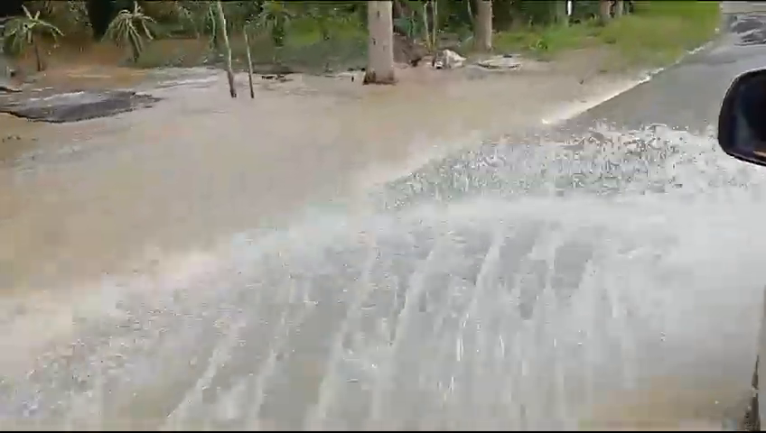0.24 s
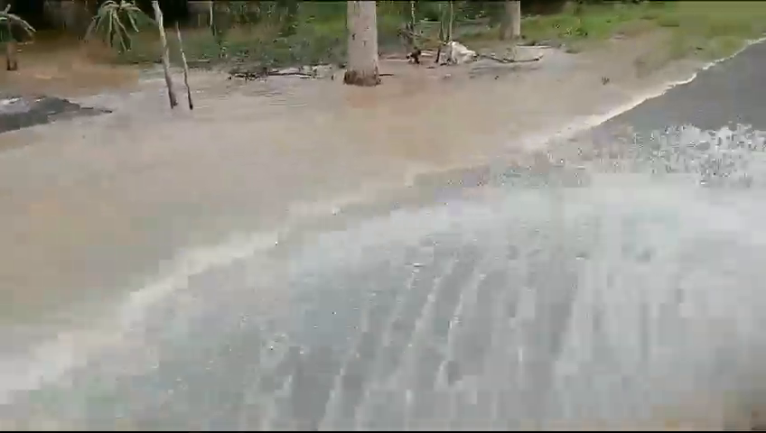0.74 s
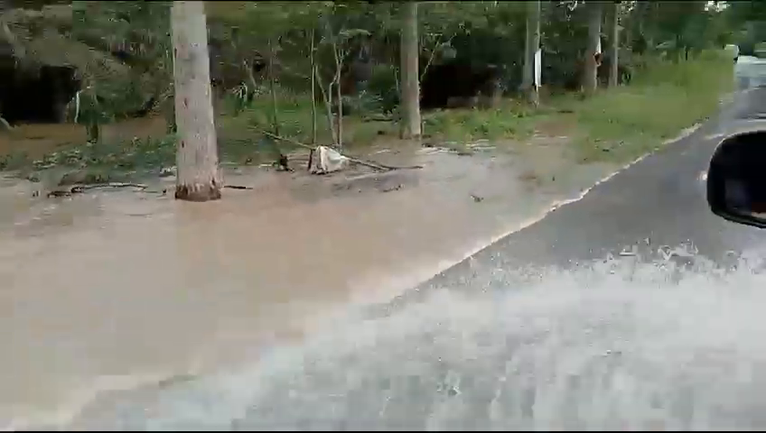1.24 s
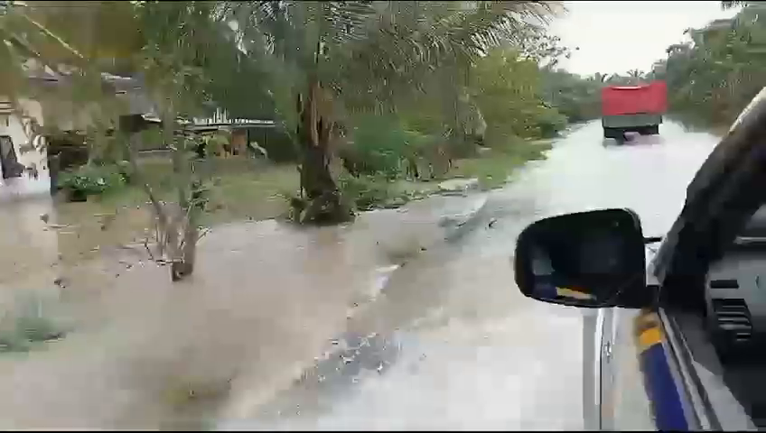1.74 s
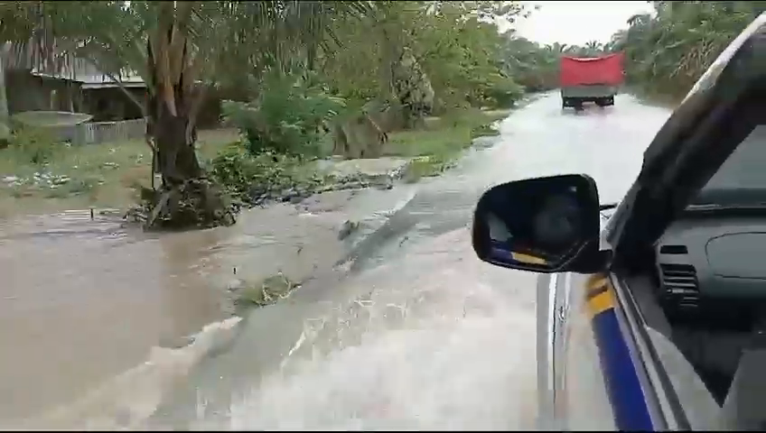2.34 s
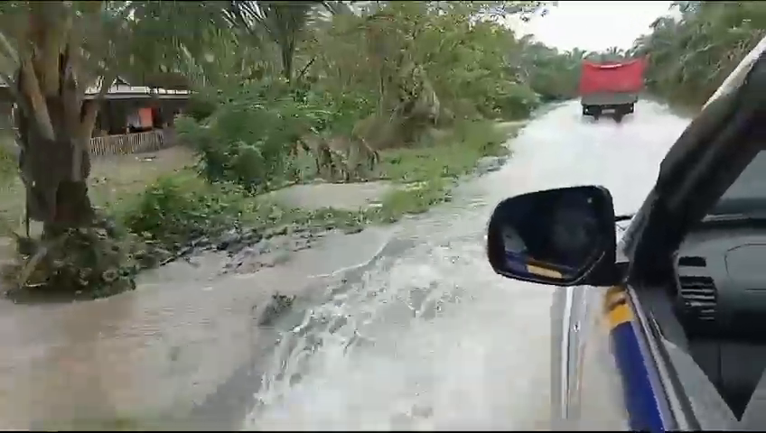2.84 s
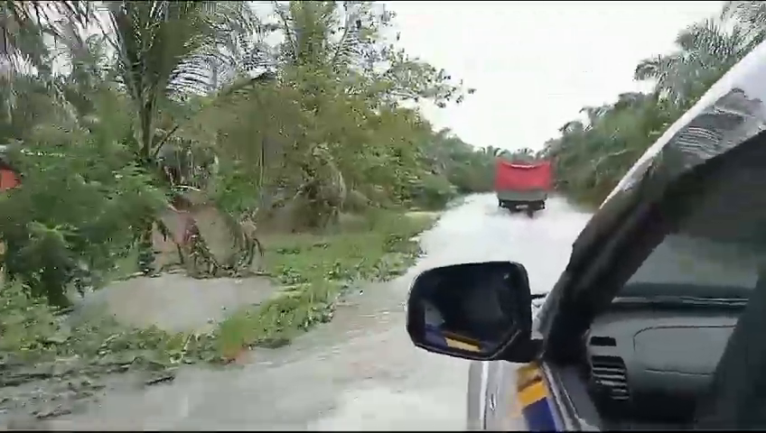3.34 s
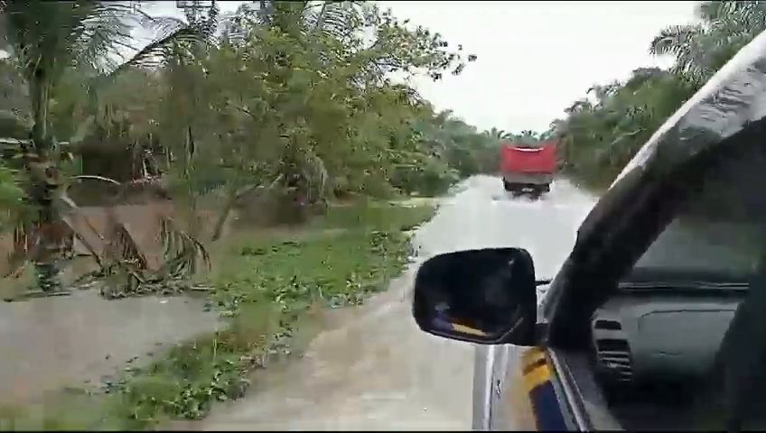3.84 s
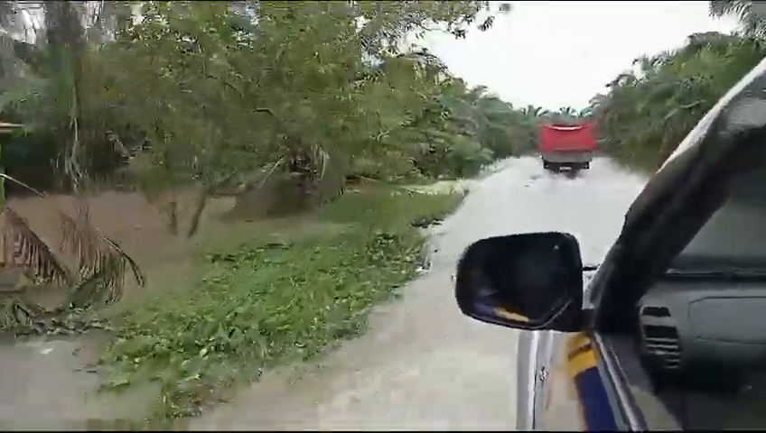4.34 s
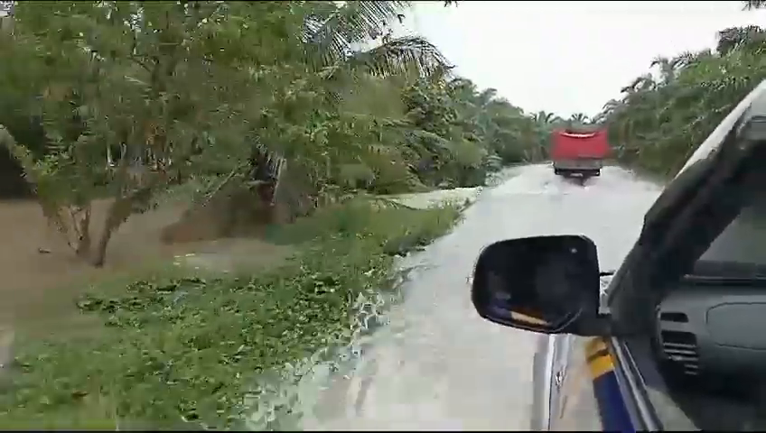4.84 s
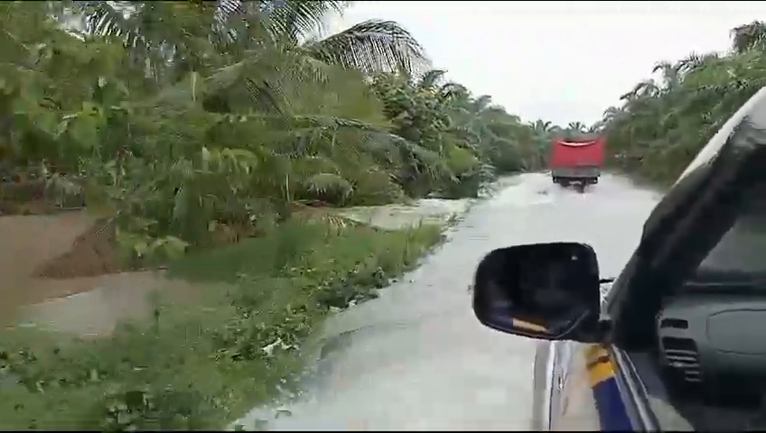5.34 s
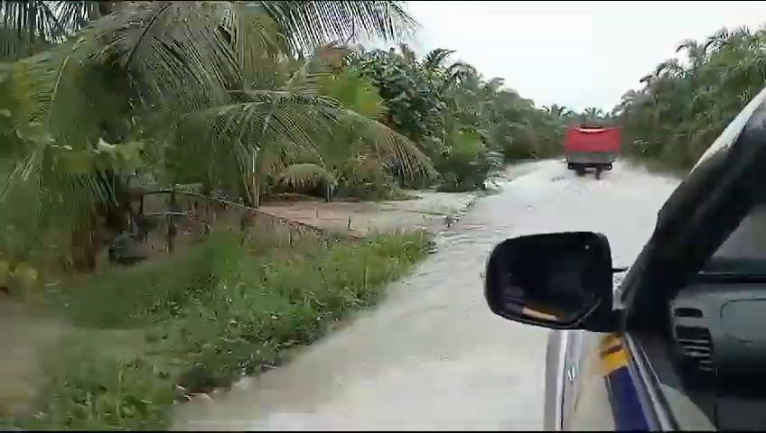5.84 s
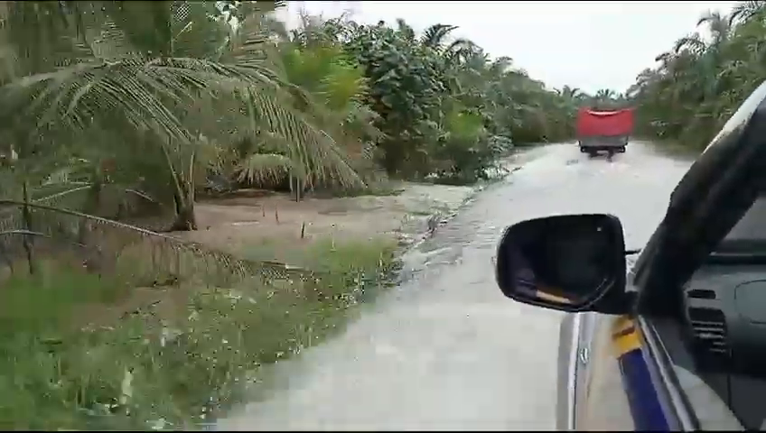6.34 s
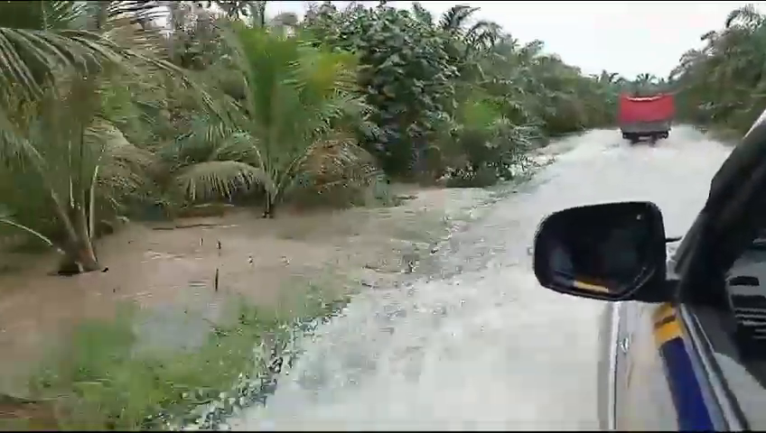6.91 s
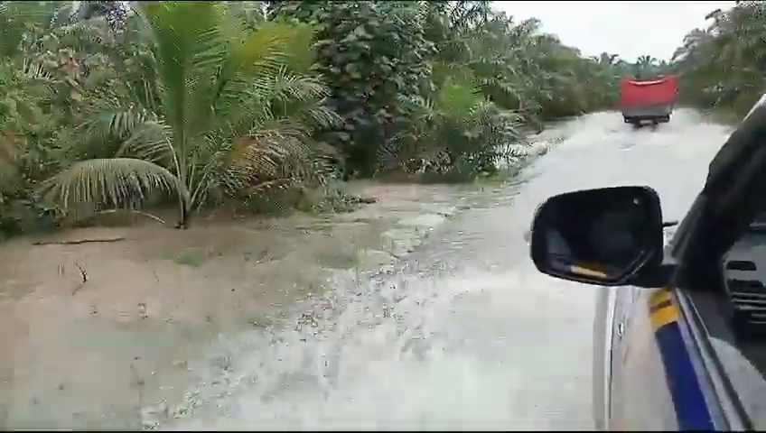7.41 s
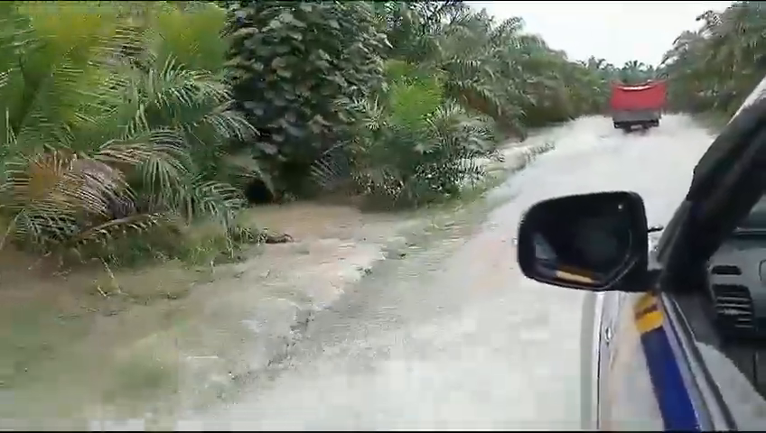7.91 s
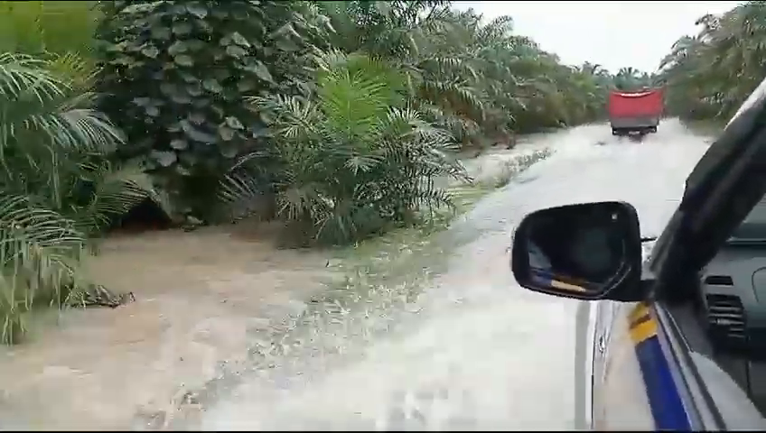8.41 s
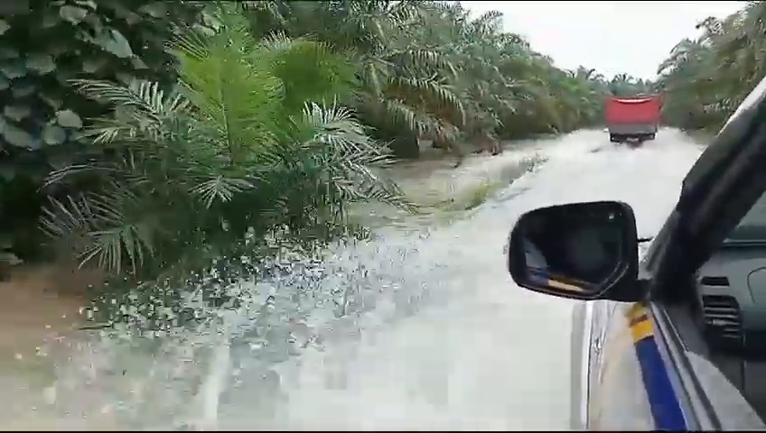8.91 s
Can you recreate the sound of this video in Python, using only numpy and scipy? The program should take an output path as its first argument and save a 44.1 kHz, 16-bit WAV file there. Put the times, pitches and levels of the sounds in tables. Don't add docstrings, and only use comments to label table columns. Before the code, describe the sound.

A car wades through floodwater: dense splashing hiss, low slosh, buffeting wind that grows rougher, and one brief gap of silence.

```python
import sys
import numpy as np
from scipy import signal
from scipy.fft import rfft, irfft, next_fast_len
from scipy.io import wavfile
from scipy.ndimage import uniform_filter1d, minimum_filter1d

SR = 44100
rng = np.random.default_rng(int(sys.argv[2]) if len(sys.argv) > 2 else 0)


def volts_from_db(level):
    exponent = np.asarray(level, float) / 20
    return 10 ** exponent


def transcribe(u):
    v = np.clip(np.atleast_2d(u).T, -1, 1)
    q = np.round(v * 32767).astype(np.int16)
    wavfile.write(sys.argv[1], SR, q)


N = 403948

CUT_S, BACK_S, WHOLE_S = 1.6524, 2.1566, 2.1668


def evened(x):
    return x / np.sqrt(np.mean(x ** 2) + 1e-20)


def smoothed(x, samples):
    return uniform_filter1d(uniform_filter1d(x, samples), samples)


def drift(span_s):
    return evened(smoothed(rng.standard_normal(N), int(span_s * SR)))


def column(table, t, count):
    rows = np.array(table)
    return np.interp(t, rows[:, 0], rows[:, count])


def read(spectrum, hz):
    f, db = np.transpose(spectrum)
    return np.interp(np.log(hz + 1), np.log(f + 1), db)


def band_db(spectrum, lo, hi):
    hz = np.arange(lo, hi)
    return 10 * np.log10(np.sum(volts_from_db(read(spectrum, hz)) ** 2) / (SR / 2))


def coloured_noise(spectrum):
    size = next_fast_len(N)
    gain = volts_from_db(read(spectrum, np.fft.rfftfreq(size, 1 / SR)))
    return evened(irfft(rfft(rng.standard_normal(N), size) * gain, size)[:N])


def steadied(x, span_s, share):
    power = smoothed(x ** 2, int(span_s * SR))
    return evened(x / (abs(power) + 1e-3) ** (share / 2))


def engine(t):
    pitch_hz, width_hz, level_db = 117, 12, -34
    r = np.exp(-np.pi * width_hz / SR)
    chance = rng.standard_normal(N) + 1j * rng.standard_normal(N)
    waver = signal.lfilter([1 - r], [1, -r], chance)
    return volts_from_db(level_db) * evened((waver * np.exp(2j * np.pi * pitch_hz * t)).real)


# frequency in Hz, level in dB per Hz.
SLOSH_COLOUR = [(24, -48.5), (40, -17), (118, 5), (221, -5), (413, -5), (709, -4), (865, -2.5),
                (1200, -5.5), (1560, -5), (2640, -120)]


def slosh(t):
    level_db, follows, surge_db = -27.5, .3, 3
    amount_db = column(SPRAY_AMOUNT, t, count=1)
    level_db = level_db + follows * (amount_db - amount_db.mean()) + surge_db * drift(.04)
    rumble_cut = signal.butter(2, 42, "highpass", fs=SR, output="sos")
    return volts_from_db(level_db) * signal.sosfilt(rumble_cut, coloured_noise(SLOSH_COLOUR))


def pops():
    pops_per_s, pop_s, level_db, spread_db = 130, .00042, 5.5, 2.5
    u = np.arange(-300, 301) / SR / pop_s
    spike = np.exp(-u ** 2 / 2) - np.exp(-(u / 3.1) ** 2 / 2) / 3.1
    size = rng.choice([-1., 1.], N) * volts_from_db(spread_db * np.minimum(rng.exponential(1, N), 3))
    hits = size * (rng.random(N) < pops_per_s / SR)
    return volts_from_db(level_db) * signal.oaconvolve(hits, spike, "same")


# time in seconds, strength in dB.
BREEZE_STRENGTH = [(0.0, -39), (.25, -18.5), (.75, -21.5), (1.25, -24), (1.42, -42.5), (2.4, -33.5),
                   (2.75, -22.5), (3.25, -45), (3.5, -21), (4.2, -28), (4.45, -29), (4.75, -21),
                   (5.55, -17.5), (5.72, -22.5), (6.3, -16), (6.85, -24.5), (8.7, -15), (9.05, -39)]
# frequency in Hz, level in dB per Hz.
THUMP_COLOUR = [(25, -44), (45, -30.5), (70, -2), (130, 1), (200, -2.5), (260, -14), (400, -44.5),
                (800, -74)]
# frequency in Hz, level in dB per Hz.
FLAP_COLOUR = [(120, -48), (190, -11.5), (250, 4), (400, -4), (600, -15), (1000, -42.5), (2000, -75)]
# time in seconds, peak in dB, length in seconds.
DULL_THUDS = [(.335, -10, 0.014), (0.373, -12.5, .026), (0.468, -11.9, .017), (0.678, -20, .029),
              (.905, -13, 0.027), (1.17, -15, 0.025), (1.302, -19.5, 0.018), (3.962, -17.5, 0.041),
              (4.49, -19, .018), (4.673, -18, .017), (4.769, -8.5, 0.021), (4.854, -17, .02),
              (4.968, -7, 0.026), (5.012, -10.5, 0.028), (5.168, -11.5, .026), (5.24, -16.5, 0.031),
              (5.529, -12.5, 0.019), (6.107, -14, 0.024), (6.167, -14, 0.033), (6.304, -13, 0.027),
              (6.352, -16, .014), (6.793, -11, 0.015), (7.36, -6.5, 0.027), (7.652, -11, 0.028),
              (7.718, -11, 0.046), (7.977, -9, .025), (8.045, -11, 0.033), (8.102, -13, 0.012),
              (8.417, -11, 0.022), (8.828, -13.5, 0.015)]
# time in seconds, peak in dB, length in seconds.
BRIGHT_SLAPS = [(0.016, -11, 0.025), (0.571, -14, 0.012), (0.968, -10, 0.021), (1.207, -8.5, 0.015),
                (1.254, -11.5, 0.026), (3.41, -13.5, 0.027), (3.87, -13, .04), (4.624, -14.5, 0.034),
                (4.828, -12, .025), (5.288, -10, 0.038), (5.488, -14.5, 0.075), (6.27, -7, 0.015),
                (6.429, -6.5, 0.022), (6.542, -9.5, 0.034), (6.843, -11, .025), (7.037, -12.5, 0.058),
                (7.106, -10.5, 0.037), (7.236, -11.5, 0.021), (7.294, -12, 0.039), (7.401, -9, 0.04),
                (7.478, -11, 0.044), (7.882, -5.5, 0.022), (7.921, -7.5, 0.021), (8.261, -11.5, 0.053),
                (8.351, -9, 0.011), (8.498, -10, 0.042), (8.58, -9.5, .035), (8.631, -9.5, 0.043),
                (8.751, -10, 0.023), (8.987, -15, 0.029)]
# time in seconds, peak in dB, length in seconds.
LIGHT_PUFFS = [(.112, -16.5, 0.018), (.608, -26, .026), (.78, -15, .06), (.85, -27, .03), (1.04, -19, .025),
               (1.642, -19.5, 0.023), (2.175, -22, 0.011), (2.72, -29, .06), (3.008, -23, 0.029),
               (3.508, -24, 0.033), (3.67, -21, 0.016), (3.78, -19.5, .029), (4.102, -22, .032),
               (4.16, -15.5, 0.034), (4.717, -15, 0.049), (4.888, -18.5, 0.057), (5.057, -23, 0.038),
               (5.358, -19, .026), (5.58, -14.5, 0.089), (5.88, -19.5, 0.098), (6.067, -19, 0.034),
               (6.38, -10.5, 0.044), (6.682, -17.5, 0.038), (6.875, -20, .043), (6.968, -18.5, .03),
               (7.771, -18, 0.024), (7.823, -27, 0.033), (8.13, -23, .034), (8.542, -21, .038),
               (9.11, -17.5, 0.036)]


def wind(t):
    breeze_db = column(BREEZE_STRENGTH, t, count=1)
    large_power = volts_from_db(breeze_db - 6 + 4 * drift(.025)) ** 2
    small_power = volts_from_db(breeze_db - 13 + 2.5 * drift(.067)) ** 2
    for buffets, small_db in ((DULL_THUDS, -9), (BRIGHT_SLAPS, -3.5), (LIGHT_PUFFS, -7)):
        small_share = volts_from_db(small_db) ** 2
        for s, peak_db, length_s in buffets:
            near = slice(max(int((s - .12) * SR), 0), int((s + .12) * SR))
            swell = np.exp(-.9 * abs(2 * (t[near] - s) / length_s) ** 2.07)
            peak = volts_from_db(peak_db) ** 2
            large_power[near] += (1 - small_share) * peak * swell
            small_power[near] += .75 * small_share * peak * swell ** 1.37
    lumps = volts_from_db(2 * evened(smoothed(rng.standard_normal(N), 500)))
    thump = steadied(coloured_noise(THUMP_COLOUR), .01, .62)
    flap = steadied(coloured_noise(FLAP_COLOUR), .0094, .9)
    eddies = lumps * (np.sqrt(large_power) * thump + np.sqrt(small_power) * flap)
    port = signal.butter(2, [45, 900], "bandpass", fs=SR, output="sos")
    return signal.sosfiltfilt(port, eddies) + np.sqrt(small_power) * pops()


# time in seconds, peak in dB, pitch in Hz, length in seconds.
BUBBLES = [
    (1.325, -22, 3460, .018),
    (1.272, -29, 5400, .025),
]


def plinks(t):
    rise_per_s = .4
    out = np.zeros(N)
    for s, peak_db, hz, length_s in BUBBLES:
        late = t - s
        swell = np.exp(-(2 * late / length_s) ** 2)
        rise = 1 + rise_per_s * np.clip(late, -.1, .1)
        out += volts_from_db(peak_db) * swell * np.sin(2 * np.pi * hz * late * rise)
    return out


# time in seconds, swell in dB, extra fizz in dB.
WATER_SHEETS = [(.03, 1, -1), (.2, 0.5, 0), (.41, 2, 2), (1.19, 4.5, -1), (1.28, 4, -1), (1.44, 3.5, -0.5),
                (1.59, 0.5, -2), (2.36, 3, 0.5), (2.81, 2.5, -0.5), (3.34, 1.5, 1), (3.82, 0, 0.5),
                (4.06, -3.5, 2.5), (4.38, 2.5, -3), (4.52, 2.5, 0), (5.07, 3, -1), (5.31, 1, 3),
                (5.44, 5.5, 1.5), (5.87, 1.5, 1.5), (6.05, 1.5, 1), (6.19, 2, 1.5), (6.5, 2.5, -3),
                (6.68, 1.5, -1), (7.15, 2, 1), (7.68, 2, -1), (7.91, -0.5, 4.5), (8.01, 0, 0),
                (8.13, 0, 0.5), (8.36, 2, 1), (8.45, 2.5, -1.2), (9.06, 0.5, 2.5)]


def sheets(t):
    rise_s, fall_s = .045, .05
    fizz_follows = .64
    s, swell_db, fizz_db = np.transpose(WATER_SHEETS)
    late = t[:, None] - s
    shape = np.exp(-(late / np.where(late < 0, rise_s, fall_s)) ** 2)
    return shape @ swell_db, shape @ (fizz_follows * swell_db + fizz_db)


# time in seconds, ring boost in dB.
DEEP_POOLS = [
    (.33, 6),
    (2.6, 3),
    (3.4, 2.5),
    (5.4, 4),
]


def wheel_arch(hz, t):
    pitch_hz, width_hz, pool_s = 4110, 360, .17
    deep_db, shallow_db, shallow_from_s, shoaling_s = 1.5, -.8, 3.44, .09
    deep = .5 - .5 * np.tanh((t - shallow_from_s) / shoaling_s)
    ring_db = shallow_db + deep * (deep_db - shallow_db)
    for s, boost_db in DEEP_POOLS:
        ring_db += boost_db * np.exp(-((t - s) / pool_s) ** 2)
    return np.exp(-((hz - pitch_hz) / width_hz) ** 2) * ring_db


# time in seconds, amount in dB, fineness in dB.
SPRAY_AMOUNT = [(0.0, -24, -6.5), (.45, -21, -8.5), (.9, -22.5, -8), (1.3, -22.5, -7), (1.64, -19, -8),
                (2.2, -25, -5), (2.65, -20, -8), (3.2, -21.5, -6.5), (4.3, -19.5, -7), (4.75, -21.5, -6),
                (5.42, -20, -9.5), (5.56, -22.5, -5.5), (7.3, -23, -6), (7.45, -29, -6.5), (7.62, -24, -6),
                (8.4, -20.5, -8.5), (8.65, -25, -5.5), (9.16, -25.5, -6.5)]
# frequency in Hz, level in dB per Hz.
SIDEWAYS_COLOUR = [(350, -29), (600, -10.5), (1050, -7.5), (1530, 0), (2230, -4), (3010, -12), (3540, -8),
                   (4970, -15), (5770, -9.5), (6600, -12), (7770, -17.5), (8900, -13.5), (12000, -26),
                   (13700, -23), (15300, -24)]
# frequency in Hz, level in dB per Hz.
FORWARD_COLOUR = [(650, -11), (1150, -3), (1530, 2.5), (2650, -8.5), (2930, -15), (3600, -13), (4200, -8),
                  (5050, -19), (6090, -16.5), (7200, -20.5), (8900, -15), (10400, -26), (12300, -33),
                  (15300, -23.5)]


def spray():
    drops_per_s, spread_db, drops_db = 2500, 1.5, -6
    patchy_db, flicker_db = 1.75, .67
    sizes = volts_from_db(spread_db * np.minimum(rng.exponential(1, N), 5))
    hits = sizes * (rng.random(N) < drops_per_s / SR)
    drops = evened(hits * rng.choice([-1., 1.], N))
    water = evened(rng.standard_normal(N) + volts_from_db(drops_db) * drops)
    hz, t, z = signal.stft(water, SR, nperseg=512, noverlap=384)
    chance = rng.standard_normal((len(t), len(hz)))
    patches = uniform_filter1d(uniform_filter1d(chance, size=10, axis=0), size=3, axis=1)
    patches = evened(patches).T
    flicker = evened(uniform_filter1d(rng.standard_normal(len(t)), size=10))
    hz = hz[:, None]
    fine = np.clip((hz - 2600) / 700, 0, 1)
    colours = []
    for colour in (SIDEWAYS_COLOUR, FORWARD_COLOUR):
        rush_norm_db = (1 - fine) * band_db(colour, 900, 2800)
        fizz_norm_db = fine * band_db(colour, 3300, 15000)
        colours.append(read(colour, hz) - rush_norm_db - fizz_norm_db)
    rush_db, fizz_db = sheets(t)
    fizz_db = fizz_db + column(SPRAY_AMOUNT, t, count=2)
    level_db = column(SPRAY_AMOUNT, t, count=1) + (1 - fine) * rush_db + fine * fizz_db
    level_db += wheel_arch(hz, t)
    level_db += patchy_db * patches + flicker_db * flicker
    field_db = np.where(t < CUT_S + .1, *colours) + level_db
    return signal.istft(z * volts_from_db(field_db), SR, nperseg=512, noverlap=384)[1][:N]


def scene():
    t = np.arange(N) / SR
    return (engine(t) + slosh(t) + wind(t) + plinks(t) + spray())[None]


def band_limit(x):
    return signal.sosfilt(signal.butter(12, 16820, fs=SR, output="sos"), x)


def record(dry):
    ceiling_db, recover_db_per_s, edge_hz = -.5, 60, 15530
    t = np.arange(N) / SR
    fall_db = t * recover_db_per_s
    over_db = np.maximum(20 * np.log10(abs(dry[0]) + 1e-9) - ceiling_db, 0)
    over_db = np.maximum.accumulate(over_db + fall_db) - fall_db
    over_db = -minimum_filter1d(-over_db, size=129)
    held = dry / volts_from_db(uniform_filter1d(over_db, size=65))
    scrap = np.interp(t, [BACK_S, WHOLE_S], [.6, .15]) * (t > BACK_S)
    gate = np.where((t < CUT_S) | (t > WHOLE_S), 1, scrap)
    edge = signal.firwin(1023, edge_hz, window=("kaiser", 10), fs=SR)
    mix = signal.oaconvolve(held * gate, edge[None], "same")
    return band_limit(mix)


dry = scene()
out = record(dry)
transcribe(out)
```